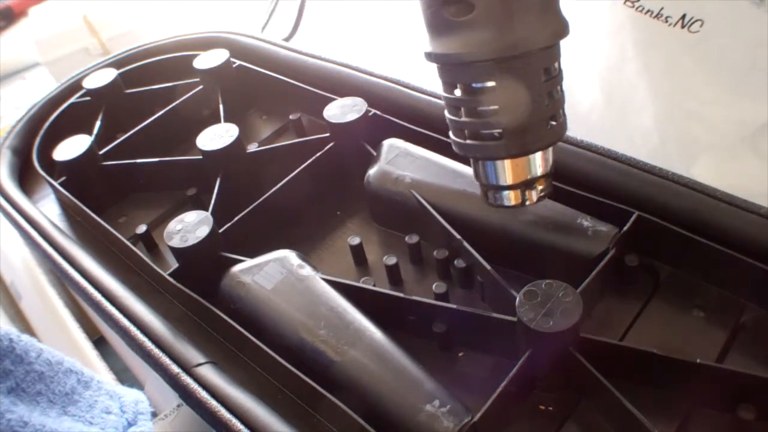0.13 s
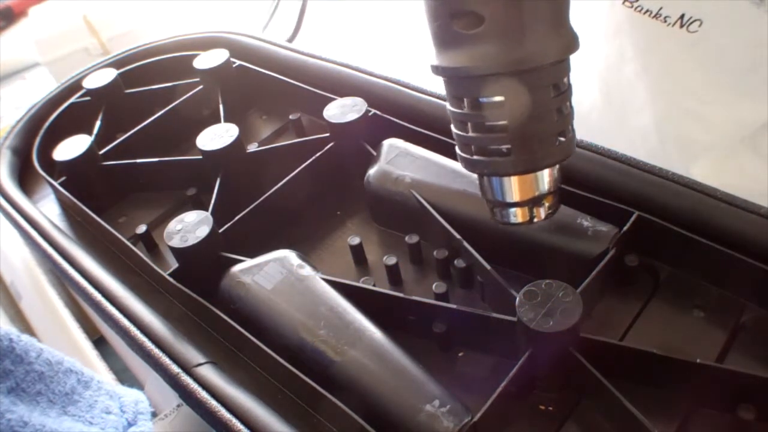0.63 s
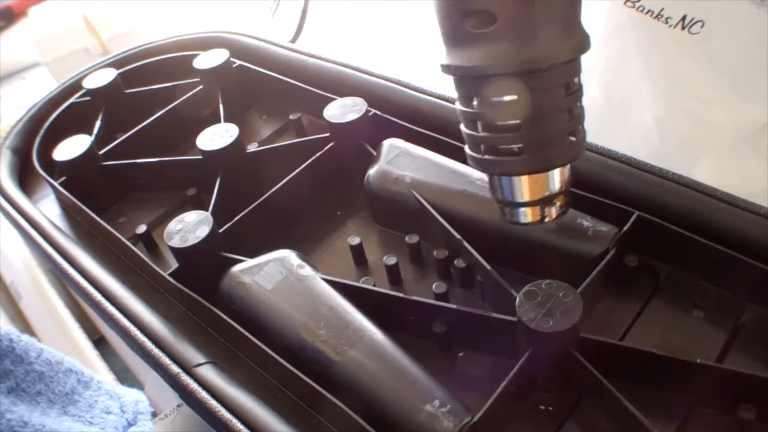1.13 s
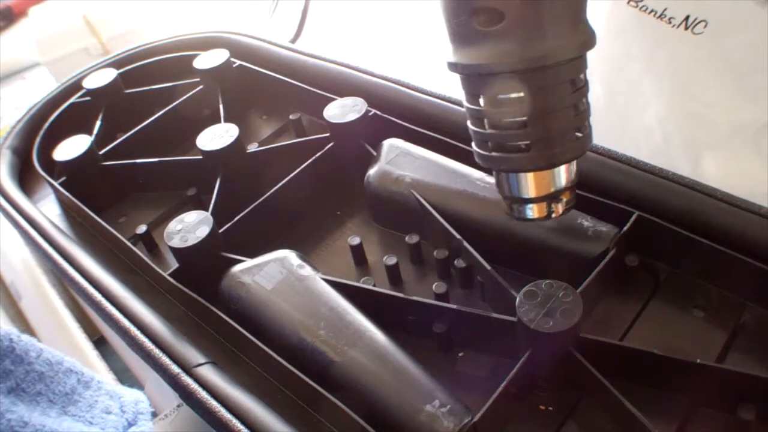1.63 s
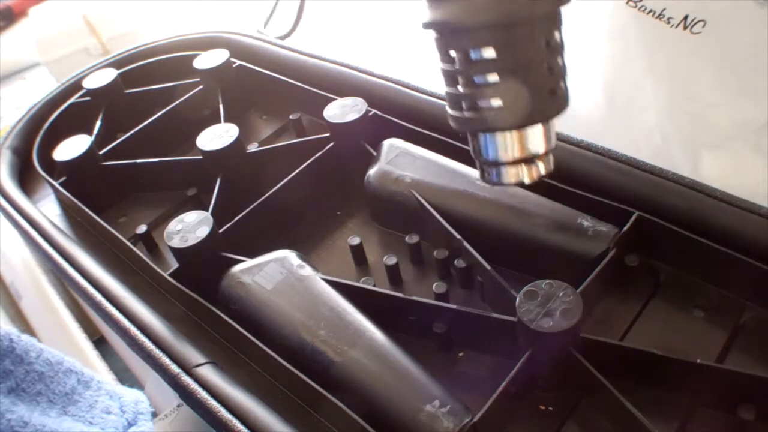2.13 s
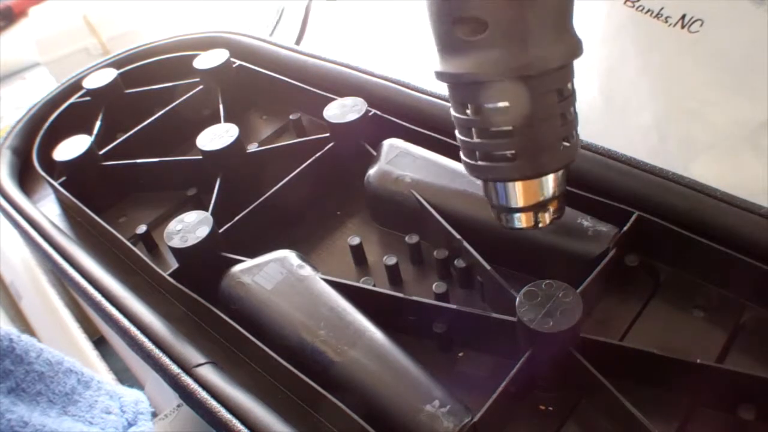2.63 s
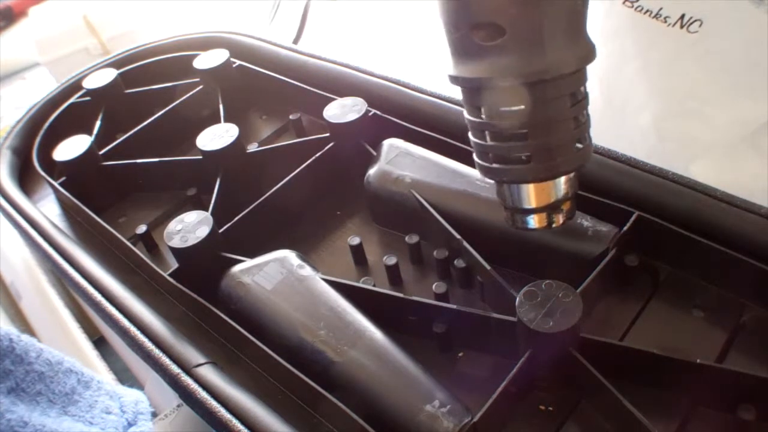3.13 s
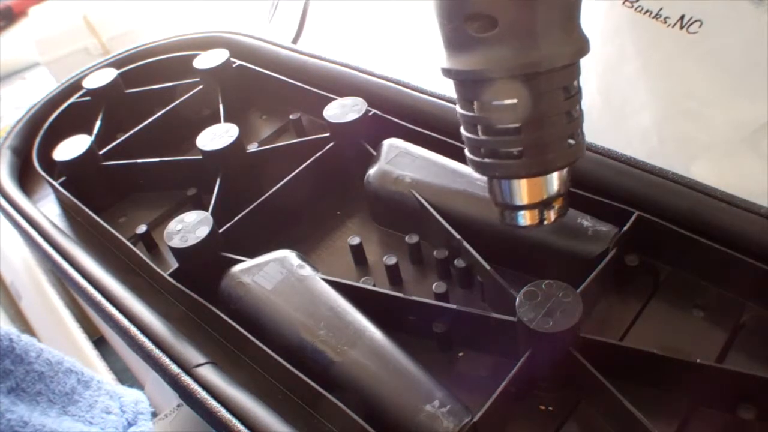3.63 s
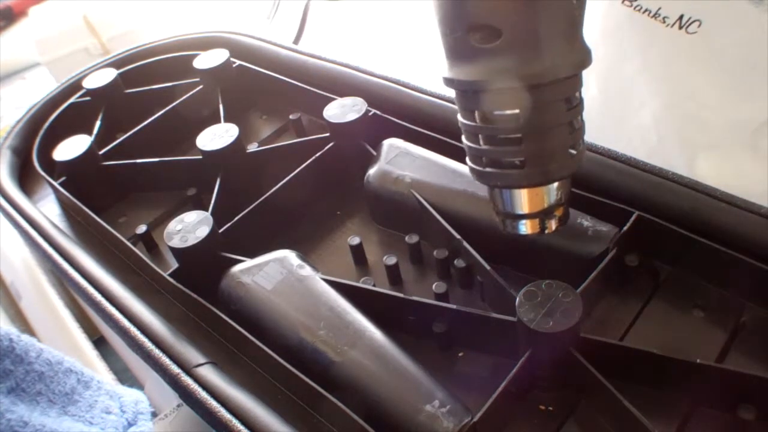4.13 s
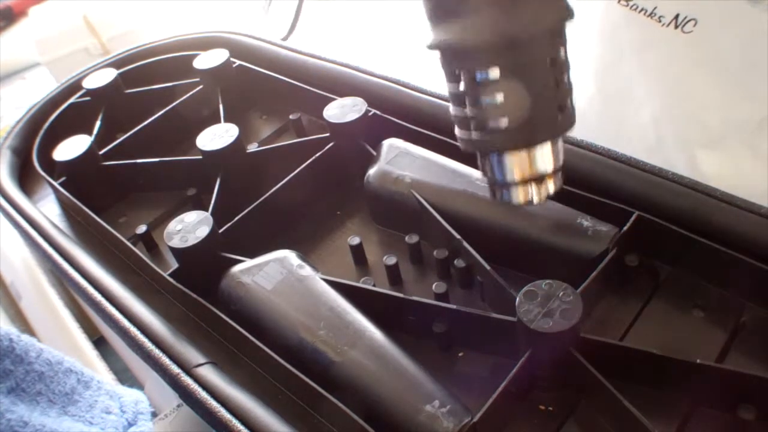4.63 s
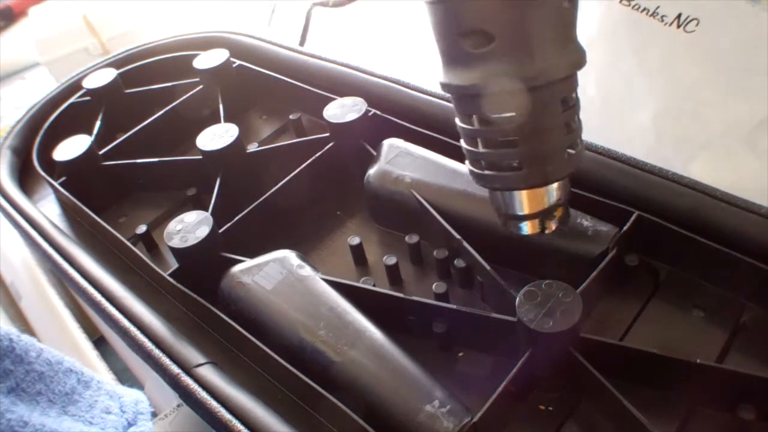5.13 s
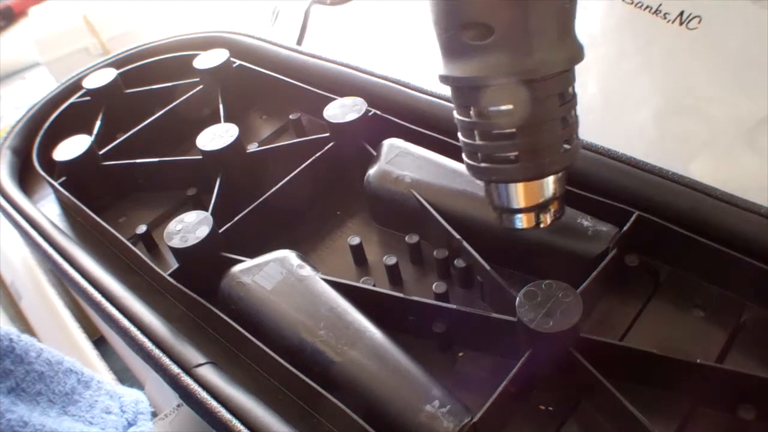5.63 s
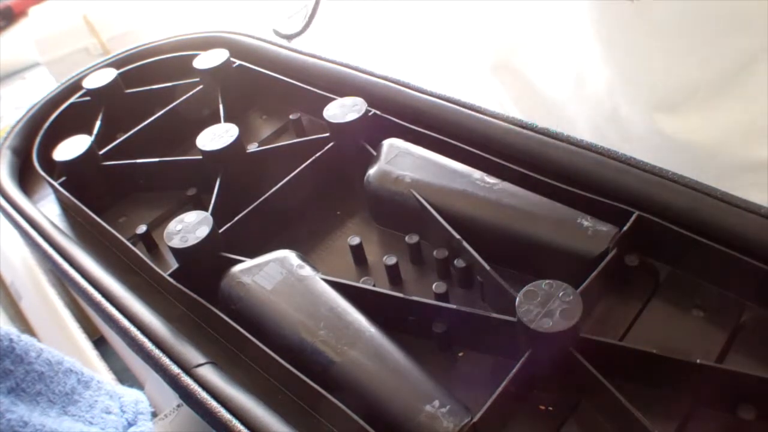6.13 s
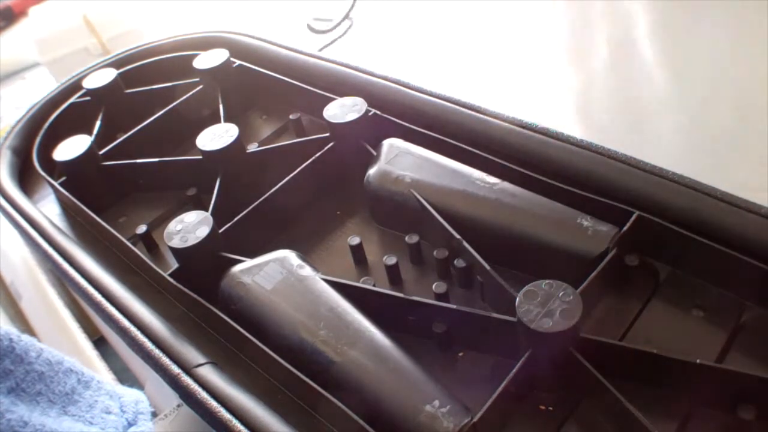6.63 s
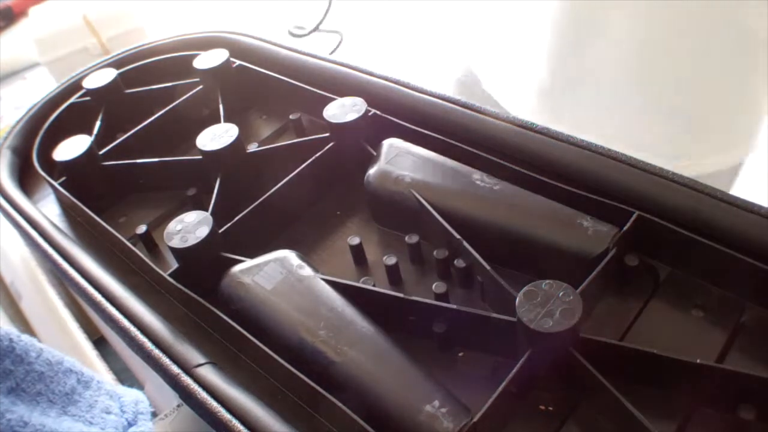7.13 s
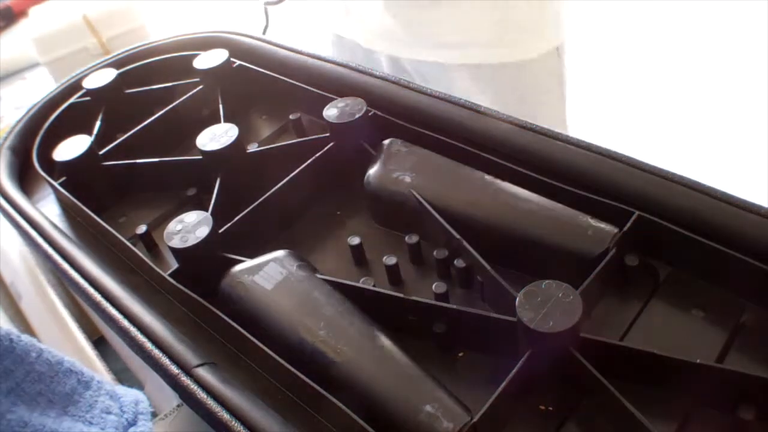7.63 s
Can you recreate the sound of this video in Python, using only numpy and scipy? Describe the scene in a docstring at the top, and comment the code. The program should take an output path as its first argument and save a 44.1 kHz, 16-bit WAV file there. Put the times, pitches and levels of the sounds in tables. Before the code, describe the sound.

Close, breathy hot-air blower with a faint motor whine, cut by a switch click and quick rundown, leaving quiet room hum and a few light knocks.

```python
"""Heat gun in a plastic shell

A heat gun blows close into a hollow plastic shell on a workbench: noise coloured by resonances.
It is lifted twice, then carried away, switched off with a snap on the way, and its fan runs down:
sines on multiples of the turn rate. Something small taps the bench and is dragged: ringing clicks and
filtered noise. An appliance hums in the room: wavering sines over steady noise."""
import sys
import numpy as np
from scipy import signal
from scipy.fft import rfft, irfft, next_fast_len
from scipy.io import wavfile

SR = 44100
rng = np.random.default_rng(int(sys.argv[2]) if len(sys.argv) > 2 else 0)


def bounce(signal):
    """Save signal as a 16-bit WAV file at the path given by the first command-line argument."""
    frames = np.transpose(np.atleast_2d(signal))
    limited = np.clip(frames, -1, 1)
    pcm = np.round(limited * 32767).astype(np.int16)
    wavfile.write(sys.argv[1], SR, pcm)


def decibels_to_gain(level_db):
    """Convert a level in decibels to a linear amplitude gain (20 dB per decade)."""
    exponent = np.asarray(level_db, float) / 20
    return 10 ** exponent


N = 342213  # length in samples
SWITCH_S = 5.9143  # moment of switching off, in seconds


def rms_one(x):
    """Scales a sound to an rms of 1."""
    return x / np.sqrt(np.mean(x ** 2) + 1e-20)


def ears(left_db, right_db):
    """Gains for the left and right ear, as a column."""
    return decibels_to_gain(np.array([[left_db], [right_db]]))


def in_time(rows):
    """Columns of a table, read at every sample by straight lines between its times."""
    s, *columns = np.transpose(rows)
    return [np.interp(np.arange(N) / SR, s, column) for column in columns]


def at_hz(points, hz):
    """Reads a table at any frequency, by straight lines over log frequency."""
    table_hz, values = np.array(points).T
    return np.interp(np.log(hz), np.log(table_hz), values)


def drift(rate_hz):
    """Slow chance: noise at every 40th sample through a double one-pole low-pass; spread 1."""
    r = np.exp(-80 * np.pi * rate_hz / SR)
    noise = rng.standard_normal(N // 40 + 2002)
    slow = signal.lfilter([1], [1, -2 * r, r * r], noise)[2000:]  # skip the filter's start
    return np.interp(np.arange(N) / 40, np.arange(len(slow)), rms_one(slow))


# How far the left ear leads the right.
# Each row: frequency in Hz, lead in radians.
EAR_LEAD = [(100, 0), (2900, 0), (3500, 0), (4700, -1), (5800, 0.4), (6350, 1.25), (7400, -2.6),
            (8300, 0.5), (9500, -1), (11500, -2.5), (13500, -0.5)]
LIKENESS_PER_DB = 0.06  # resonances reach both ears alike, hollows between them do not


def pair_noise(colour, likeness, peaks=()):
    """Spectra of two noises that share a part, coloured and shaped by resonances for each ear."""
    size = next_fast_len(N)
    hz = np.maximum(np.fft.rfftfreq(size, 1 / SR), 1)
    peak_db = np.zeros((2, len(hz)))
    for top_hz, width_hz, left_db, right_db in peaks:
        bump = 1 / (1 + (2 * (hz - top_hz) / width_hz) ** 2)
        peak_db += np.outer([left_db, right_db], bump)
    shared, own = rfft(rng.standard_normal((2, size)))
    unlike = (1 - at_hz(likeness, hz)) * decibels_to_gain(-LIKENESS_PER_DB * peak_db.mean(axis=0))
    alike = np.clip(1 - unlike, 0, 1)
    # the own part has opposite sign at the two ears
    pair = np.sqrt(1 + alike) * shared + np.sqrt(1 - alike) * own * [[1], [-1]]
    turn = np.exp(.5j * at_hz(EAR_LEAD, hz) * np.array([[1], [-1]]))
    return hz, turn * pair * decibels_to_gain(at_hz(colour, hz) + peak_db), size


# The nozzle is lifted and lowered again.
# Each row: middle in seconds, added height, length in seconds.
NOZZLE_LIFTS = [(2.284, 1.08, 0.46), (4.491, 1.52, 0.46)]
# The gun is carried off: 0 low in the shell, 1 lifted, 2 swung away, 3 at arm's length.
# Each row: time in seconds, height on that scale.
CARRIED_OFF = [(5.72, 0), (5.85, 0.74), (5.97, 1.5), (6.08, 2), (6.25, 2.5), (6.5, 3), (7.76, 2.5)]


def nozzle_height():
    """Each lift is a smooth rise and fall; at the end the gun is carried off."""
    t, height = np.arange(N) / SR, in_time(CARRIED_OFF)[0]
    for middle_s, top, length_s in NOZZLE_LIFTS:
        swing = np.clip((t - middle_s) / length_s, -.5, .5)
        height = height + top * np.cos(np.pi * swing) ** 1.38
    return np.clip(height, 0, 3)


# Strength of the air stream as it reaches the microphone.
# Each row: time in seconds, level in dB.
AIR_STRENGTH = [(0.0, -24), (1.08, -26.5), (2.2, -26.5), (2.65, -24.5), (3.03, -26.5), (3.86, -26),
                (4.08, -27), (4.62, -26), (5.7, -24.5), (5.9, -25.5), (5.93, -31), (6.06, -33),
                (6.16, -30.5), (6.24, -35), (6.5, -44.5), (6.8, -56.5), (7.06, -63.5), (7.76, -76)]
# Broad colour of the stream.
# Each row: frequency in Hz, relative level in dB per Hz.
STREAM_COLOUR = [(100, -25), (300, -8.5), (500, -6), (900, -1), (1400, -2), (2200, -6.5), (4000, -4),
                 (7000, -10), (10000, -9.5), (14300, -12)]
# How alike the stream is at the two ears, before the resonances.
# Each row: frequency in Hz, likeness from 0 to 1.
STREAM_LIKENESS = [(60, 1), (330, 0.84), (550, 0.99), (1200, 0.98), (1600, 0.67), (1900, 0.45),
                   (2300, 0.75), (4500, 0.6), (5500, 0.29), (8000, 0.16), (9200, 0.12), (14000, 0.076)]
# Barrel and shell resonances, in turn: nozzle low, lifted, swung away, at arm's length.
# Each row: frequency in Hz, width in Hz, left boost in dB, right boost in dB (minus is a dip).
NOZZLE_LOW = [(390.0, 230, -1.5, -6), (438, 85, -17, -11.5), (595, 160, 9.5, 10.5), (673, 58, -6, -9.5),
              (775, 76, 2.5, 0), (906, 23, 6, 8.5), (1157, 267, 11.5, 11.5), (1387, 99, -9, -7.5),
              (1443, 92, 7, 11.5), (1517, 52, -5.5, -11), (1520, 102, 0.5, -14), (1762, 124, 12.5, 7),
              (1867, 230, -11, -9), (1985, 110, 4.5, 6), (2323, 410, 9.5, 8), (2880, 65, 8, 0),
              (2860, 1400, -8.5, -8), (3222, 340, 12.5, 5), (3893, 230, 8.5, 4), (4480, 200, -4.5, -5),
              (4710, 190, 6.5, 5), (5230, 530, 7, -1.5), (5230, 120, -11, -7), (5710, 290, -6.5, -3),
              (6350.0, 220, 9, 5.5), (6600, 570.0, 0.3, -3), (8330, 470, 7.5, 4.5), (13200, 1100, 8.5, 3)]
NOZZLE_LIFTED = [(427, 120, -24, -25), (563, 180, 10, 9.5), (665, 50, -8, -10), (933, 240, 6, 6),
                 (1135, 200, 9, 8.5), (1243, 93, 7.5, 7), (1500, 120, 9, 5), (1580.0, 1600, -7, -8),
                 (1870, 120, 7, 9), (2100, 590.0, 2, 8), (2330, 470, 10.5, 8.5), (3250, 640, 11, 2.5),
                 (4330, 510.0, 3.5, 2), (5370, 180.0, 3, 7), (6300, 1400, 8, 0), (7050, 450.0, -5, -1),
                 (7970, 140, 8, 7)]
SWUNG_AWAY = [(440, 150, -13, -11), (514, 80, 5, 7), (680, 65, -5, -7), (720, 220, 8, 6),
              (900, 290, -1.5, -4), (1185, 320, 14, 16), (1360, 130, -12, -10), (1690, 310, 10.5, 6),
              (2310, 320, -3, 8), (2920, 50, -9, -2.8), (3000, 800, 7.5, -3), (4040, 550, 4.5, -2),
              (4680, 240, 8.5, 4), (5660, 500, 0, 0), (6640, 480, 6, -2), (11200, 1500, -6, -12)]
ARMS_LENGTH = [(294, 250, 3, 2), (710, 70, 7, 10), (900, 200, 0, 1), (1230, 200, 15.5, 12),
               (1540, 250, 11, 10), (2030, 1300, -7, -11), (3820, 200, 13, 3), (3700, 1600, -8, -13),
               (4840, 120, 13, 15), (5700, 640, -3, -6), (6200, 350, 12, 7), (6900, 500, 11, 10),
               (14000, 1700, 11, 2)]
# Treble against the roar at full flow, one row for each of these four poses.
# Each row: hiss in dB, sizzle in dB.
POSE_BRIGHTNESS = [(-2, -8.5), (-1, -7), (-1.5, -11.5), (-10.5, -13)]
FULL_DB = -26  # strength of the stream at full flow
HISS_FOLLOWS, SIZZLE_FOLLOWS = 0.8, 0.66  # share of the stream's swing in dB
# the echo off the shell comes later as the nozzle rises
ECHO_MS, ECHO_MS_PER_HEIGHT, ECHO_BEND = 0.275, 0.042, 2.3
ECHO_SHARE, ECHO_HZ = 0.3, (1200, 7000)  # the shell throws back a band of treble


def shell_echo(direct, height):
    """The shell throws the stream back a fraction of a millisecond late."""
    echo_ms = ECHO_MS + ECHO_MS_PER_HEIGHT * height ** ECHO_BEND
    late = np.arange(N) - SR * echo_ms / 1000
    echo = np.array([np.interp(late, np.arange(N), ear) for ear in direct])
    echo = signal.lfilter(*signal.butter(1, ECHO_HZ, "band", fs=SR), echo)
    # no echo with the nozzle low or far off
    strength = ECHO_SHARE * np.clip(np.minimum(3 * height, 2.7 - height), 0, 1)
    return (direct + strength * echo) / np.sqrt(1 + strength ** 2 / 2)


def stream():
    """Turbulent air through barrel and shell; moving the nozzle trades one set of resonances for the next."""
    height = nozzle_height()
    swing_db = in_time(AIR_STRENGTH)[0] - FULL_DB
    hiss_db, sizzle_db = (np.interp(height, np.arange(len(POSE_BRIGHTNESS)), column)
                          for column in np.transpose(POSE_BRIGHTNESS))
    gust = drift(3.0)  # shared by all three bands
    gains = []
    for bright_db, follows in ((0, 1), (hiss_db, HISS_FOLLOWS), (sizzle_db, SIZZLE_FOLLOWS)):
        flutter_db = 0.2 * gust + 0.68 * drift(8.3)
        gains.append(decibels_to_gain(FULL_DB + bright_db + follows * swing_db + flutter_db))
    edges_hz = (450, 1500, 7000, 14300)  # limits of roar, hiss and sizzle when setting levels
    out = 0
    for pose, peaks in enumerate((NOZZLE_LOW, NOZZLE_LIFTED, SWUNG_AWAY, ARMS_LENGTH)):
        share = np.clip(1 - np.abs(height - pose), 0, 1)
        hz, pair, size = pair_noise(STREAM_COLOUR, STREAM_LIKENESS, peaks)
        roar = 1 / (1 + (hz / edges_hz[1]) ** 12)
        sizzle = 1 / (1 + (edges_hz[2] / hz) ** 12)
        hiss = 1 - roar - sizzle
        for k, part in enumerate((roar, hiss, sizzle)):
            inside = (hz > edges_hz[k]) & (hz < edges_hz[k + 1])
            centre = pair.mean(axis=0)[inside]  # mean of both ears
            centre_rms = np.sqrt(2 * np.sum(np.abs(centre) ** 2)) / size
            band = irfft(pair * part, size)[:, :N] / centre_rms
            out = out + np.sqrt(share) * gains[k] * band
    return shell_echo(out, height)


# Whine on multiples of the turn rate.
# Each row: multiple, rms level in dB before it wavers and runs down, left over right in dB.
FAN_WHINE = [(8, -47, 1), (15, -45, 7), (25, -50.5, 0), (29, -55, 3), (30, -52.5, -1)]
WHINE_WAVER_DB = 2.5
# the motor speeds up as the air warms: start, gain by switch-off, power law
TURNS_PER_S, WARM_GAIN_PER_S, WARM_BEND = 281.0, 5.0, 4
SHAKE_DB, SHAKE_RISE_DB = -52, 7.5  # the case shaking in the hand grows with speed
SPIN_DOWN_S = 0.086  # time for the speed to fall to 1/e


def motor():
    """The rotor shakes the case once a turn and whines on multiples; all of it sinks when the power is cut."""
    t = np.arange(N) / SR
    warmth = np.minimum(t / SWITCH_S, 1) ** WARM_BEND
    turns = TURNS_PER_S + WARM_GAIN_PER_S * warmth
    coast = np.exp(-np.maximum(t - SWITCH_S, 0) / SPIN_DOWN_S)
    phase = 2 * np.pi * np.cumsum(turns * coast * (1 + 0.001246 * drift(8.75))) / SR
    shake_db = SHAKE_DB + SHAKE_RISE_DB * warmth + 1.5 * drift(9.9)
    out = decibels_to_gain(shake_db) * np.sin(phase) * ears(1.6, -1.6)
    for multiple, level_db, pan_db in FAN_WHINE:
        tone = decibels_to_gain(level_db + WHINE_WAVER_DB * drift(2.5)) * np.sin(multiple * phase)
        out = out + tone * ears(pan_db / 2, -pan_db / 2)
    return np.sqrt(2) * out * coast ** 7.2  # loudness falls much faster than speed


# Colour of the room and microphone noise.
# Each row: frequency in Hz, relative level in dB per Hz.
ROOM_COLOUR = [(20, -42), (45, -32), (80, -16), (130, -7), (250, -8.5), (400, -17.5), (860, -22.5),
               (1400, -28), (2500, -31.5), (4000, -33), (9000, -30.5), (14300, -31)]
# How alike that noise is at the two ears.
# Each row: frequency in Hz, likeness from 0 to 1.
ROOM_ALIKE = [(60, 1), (240, 0.95), (950, 0.69), (3760, 0.12), (14900, 0.11)]
# The appliance's hum.
# Each row: frequency in Hz and rms level in dB, both before they waver.
HUM_TONES = [(59.2, -69), (124.5, -52), (166.9, -59.5), (251, -58), (414.5, -65.5)]
ROOM_DB = -49.5  # rms of the noise, before the slight tilt to the left


def room():
    """A wavering appliance hum over steady room and microphone noise."""
    _, pair, size = pair_noise(ROOM_COLOUR, ROOM_ALIKE)
    out = decibels_to_gain(ROOM_DB) * rms_one(irfft(pair, size)[:, :N])
    for tone_hz, level_db in HUM_TONES:
        phase = 2 * np.pi * np.cumsum(tone_hz * (1 + 0.01028 * drift(5.47))) / SR
        out = out + np.sqrt(2) * decibels_to_gain(level_db + 2.5 * drift(7.4)) * np.sin(phase)
    return out * ears(.5, -.5)


def ring(clicks, hz, t60):
    """A unit click sets a sine of height 1 ringing; it falls by 60 dB in t60 seconds."""
    r, w = decibels_to_gain(-60 / (t60 * SR)), 2 * np.pi * hz / SR
    # the tiny offset keeps the filter away from vanishing numbers
    return signal.lfilter([0, np.sin(w)], [1, -2 * r * np.cos(w), r * r], clicks + 1e-18)


def blow(at_s, spread_s, modes, crack_db):
    """A short ragged contact cracks and rings the modes, differently at each ear."""
    t = np.arange(4096) / SR
    contact = t / spread_s * np.exp(1 - t / spread_s)  # strongest after spread_s
    grit = rng.standard_normal((3, len(t)))  # one shared, one for each ear
    crack = np.diff(contact * (grit[0] + 0.84 * grit[1:]), prepend=0)
    force = crack / np.sqrt(spread_s * SR)
    rings = 0
    for hz, level_db, t60 in modes:
        rings = rings + decibels_to_gain(level_db) * ring(force, hz, t60) * SR / (8 * hz)  # low modes gain most
    out, start = np.zeros((2, N)), round(at_s * SR)
    out[:, start:start + len(t)] = rings + decibels_to_gain(crack_db) * crack
    return out


# Ringing parts of the slide switch.
# Each row: frequency in Hz, relative level in dB, time to fall by 60 dB in seconds.
SWITCH_MODES = [(346, -17.5, 0.03), (1650, -11.5, 0.011), (4760, -10.5, 0.0091), (9000, -9, 0.0086),
                (12700, -8, 0.0067)]


def switch():
    """The slide switch snaps off: one contact rings its parts."""
    return blow(SWITCH_S, 0.0008, SWITCH_MODES, crack_db=-9.5) * ears(2.5, -1.5)


# The small thing slides.
# Each row: start of the hold in seconds, level in dB before it flutters, hold in seconds.
SLIDES = [(7.1, -56.5, 0.036), (7.225, -52, 0.08)]
DRAG_RISE_DB_PER_S, DRAG_FADE_DB_PER_S = 798, 54.5


def drag_gain():
    """Each slide starts quickly, holds, then fades."""
    t, gain = np.arange(N) / SR, 0
    for s, level_db, hold_s in SLIDES:
        rise_db = DRAG_RISE_DB_PER_S * np.maximum(s - t, 0)
        fade_db = DRAG_FADE_DB_PER_S * np.maximum(t - s - hold_s, 0)
        gain = gain + decibels_to_gain(level_db - rise_db - fade_db)
    return gain


# Taps on the bench: a faint touch, then a hard knock and two weaker ones.
# Each row: time in seconds, gain in dB, left over right in dB, share of the contact and ring times.
BENCH_TAPS = [(6.9127, -41, 3, 1.2), (7.2209, -21.5, 2, 1.0), (7.2977, -29, 6, 0.38),
              (7.4031, -45, 2.5, 0.46)]
# Ringing modes of the bench.
# Each row: frequency in Hz, relative level in dB, seconds to fall by 60 dB at a share of 1.
BENCH_MODES = [(400, -22, .012), (700, -18, .015), (1050, -17, .015), (1700, -15, 0.0089),
               (2820, -11, 0.006), (4200, -13, .004), (5600, -8.5, 0.0081), (8100, -1.5, 0.006),
               (11000, -14, .004), (13500, -14, .005)]


def taps():
    """A small hard thing touches the bench faintly, knocks hard, then twice weaker, and is dragged a little."""
    out = 0
    for s, level_db, pan_db, share in BENCH_TAPS:
        modes = [(hz, mode_db, t60 * share) for hz, mode_db, t60 in BENCH_MODES]
        tap = blow(s, 0.0006 * share, modes, crack_db=-5.5)
        out = out + tap * ears(level_db + pan_db / 2, level_db - pan_db / 2)
    band = signal.butter(1, [1800, 13000], "band", fs=SR, output="sos")
    rub = rms_one(signal.sosfilt(band, rng.standard_normal((2, N))))
    return out + drag_gain() * decibels_to_gain(2.2 * drift(30.0)) * rub


def scene():
    """All the sounds together."""
    return stream() + motor() + switch() + taps() + room()


def band_limit(x):
    """A steep low-pass at the top of the band."""
    return signal.sosfilt(signal.butter(12, 15530, fs=SR, output="sos"), x)


# gain control: most added gain, level below which it starts, averaging time, dB added per dB below
BOOST_DB, LOUD_DB, RECOVER_S, BOOST_PER_DB = 3, -26, .12, .5
CUTOFF_HZ = 14350


def record(dry):
    """Gain control turns up the quiet, peaks are rounded near full scale, the top is cut."""
    r = np.exp(-1 / (RECOVER_S * SR))
    power = signal.lfilter([1 - r], [1, -r], np.mean(dry ** 2, axis=0), zi=[decibels_to_gain(2 * LOUD_DB)])[0]
    level_db = 10 * np.log10(power + 1e-12)
    gain_db = np.clip(BOOST_PER_DB * (LOUD_DB - level_db), 0, BOOST_DB)
    rounded = 1.22 * np.tanh(dry * decibels_to_gain(gain_db) / 1.182)
    low_pass = signal.ellip(12, .5, 70, CUTOFF_HZ, fs=SR, output="sos")
    mix = signal.sosfilt(low_pass, rounded)
    return band_limit(mix)


dry = scene()
out = record(dry)
bounce(out)
```